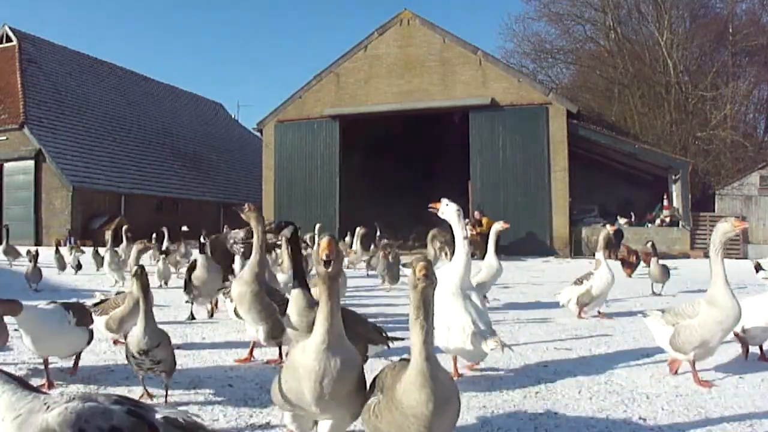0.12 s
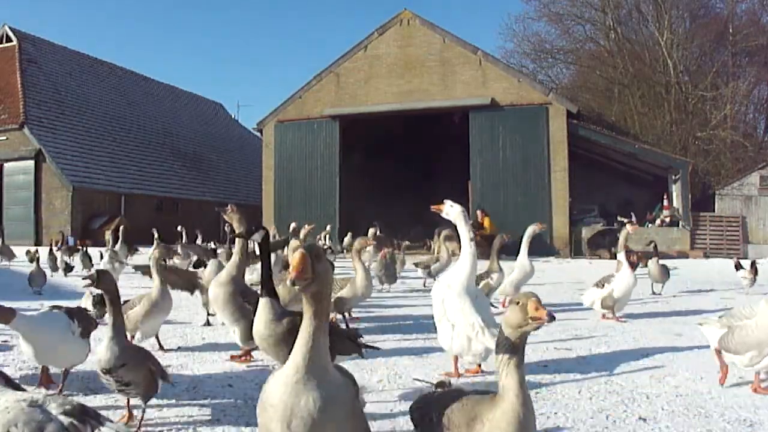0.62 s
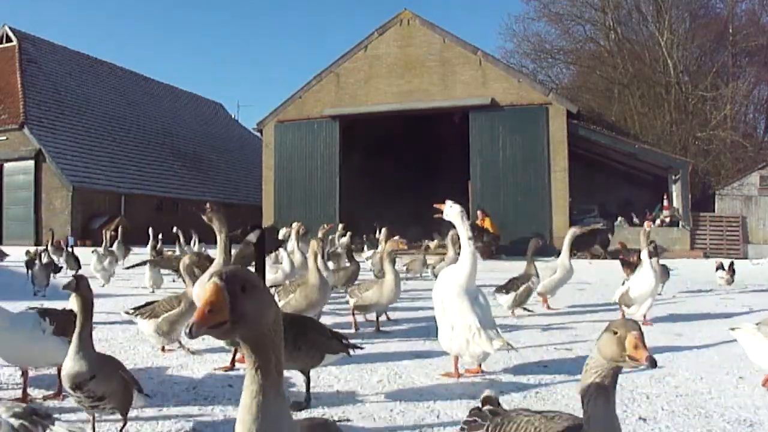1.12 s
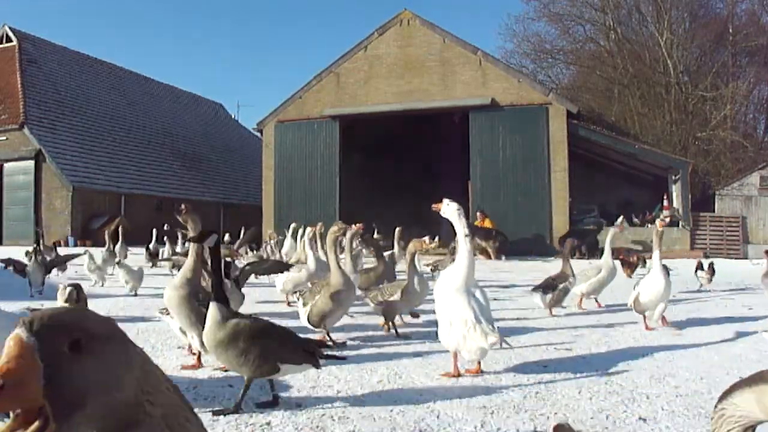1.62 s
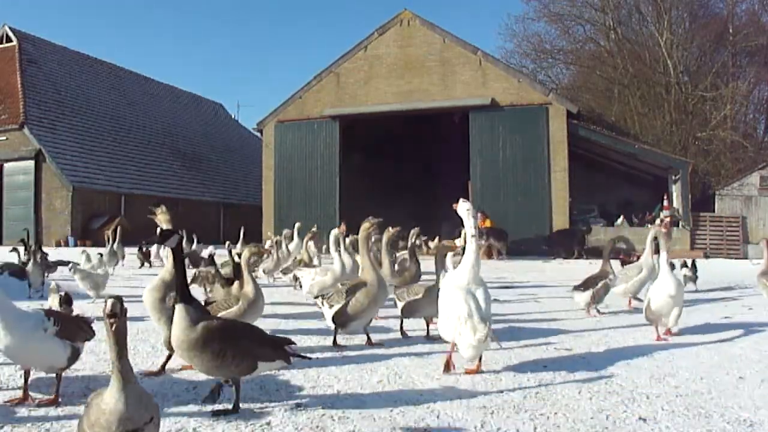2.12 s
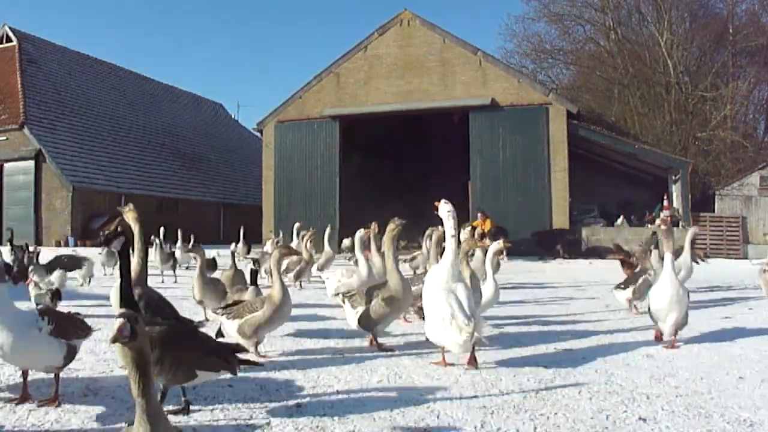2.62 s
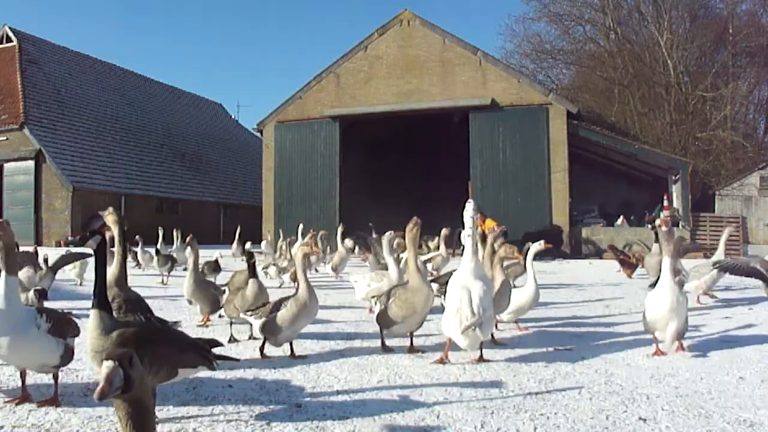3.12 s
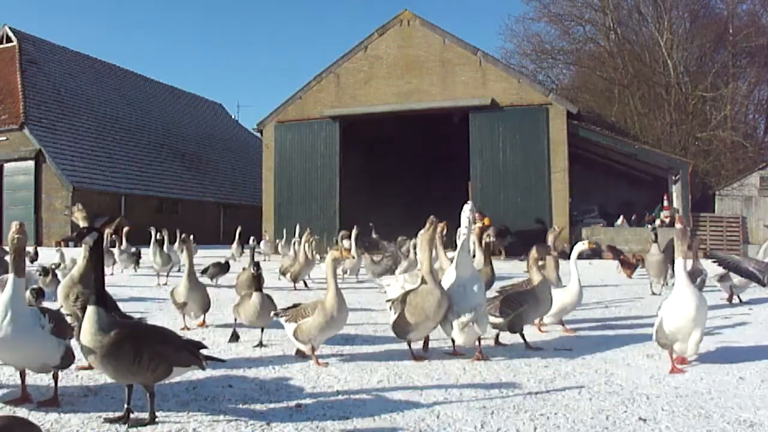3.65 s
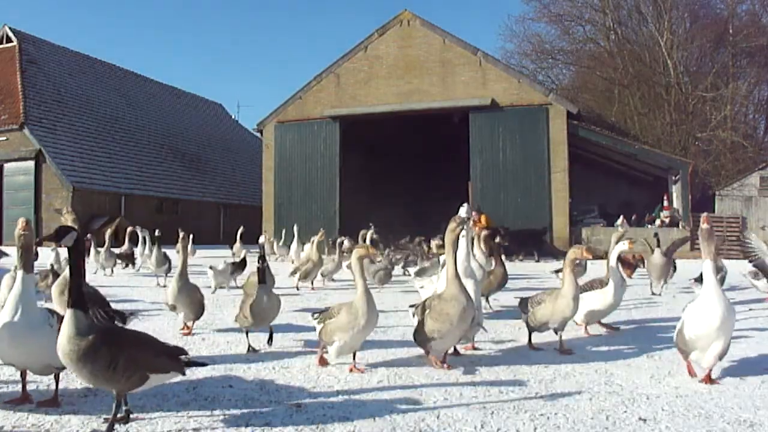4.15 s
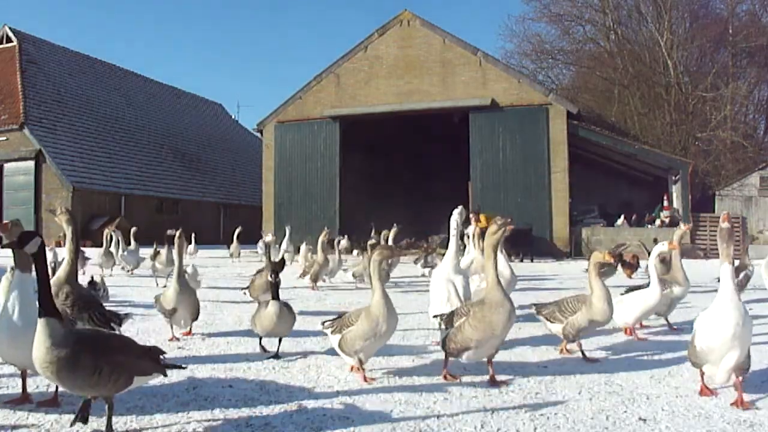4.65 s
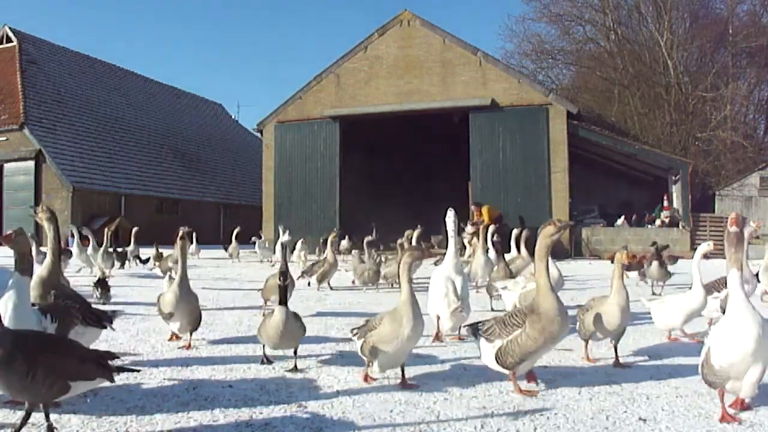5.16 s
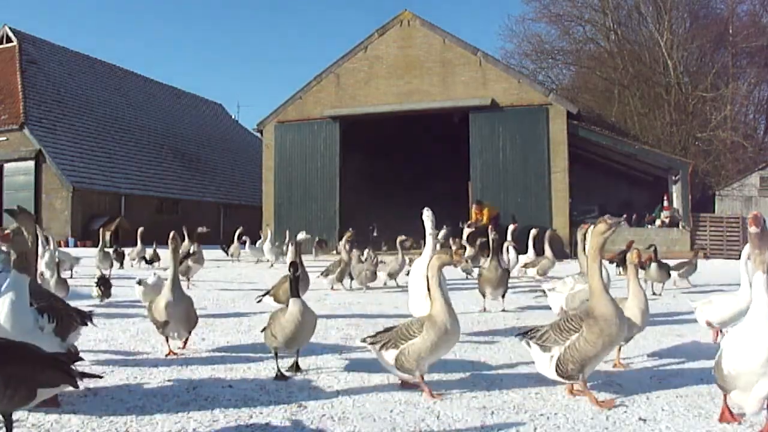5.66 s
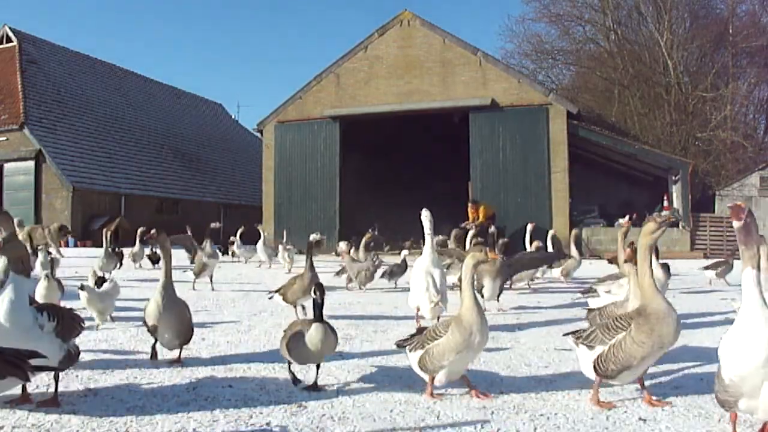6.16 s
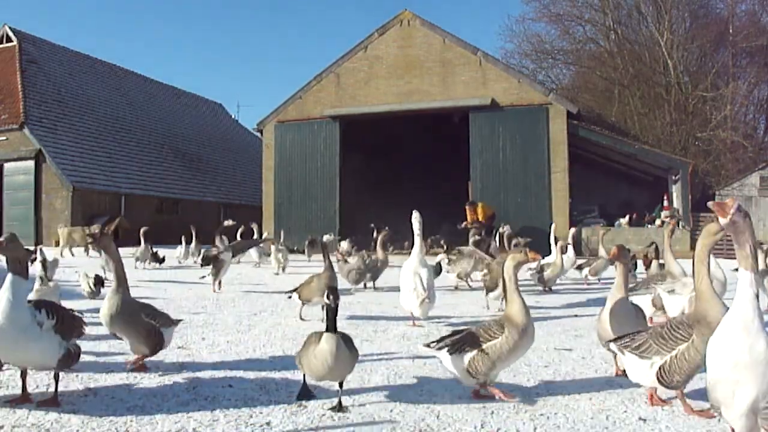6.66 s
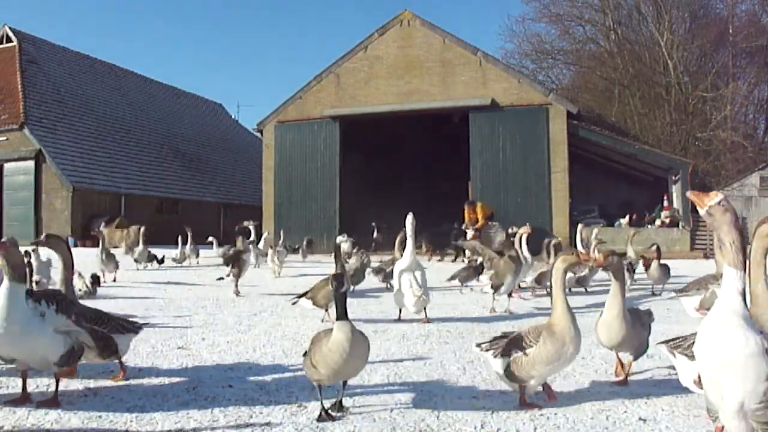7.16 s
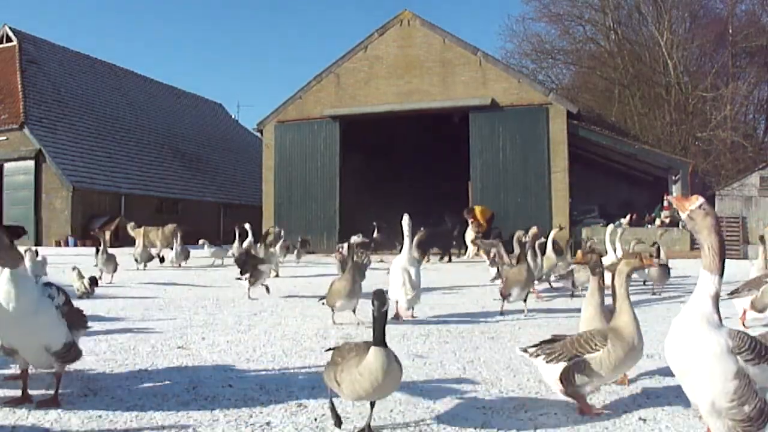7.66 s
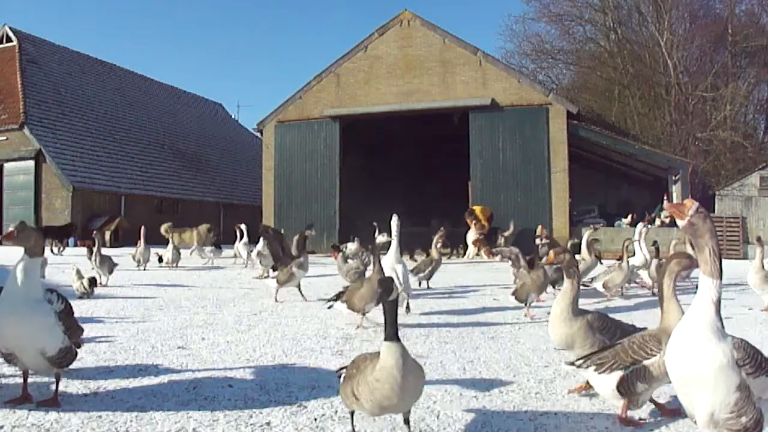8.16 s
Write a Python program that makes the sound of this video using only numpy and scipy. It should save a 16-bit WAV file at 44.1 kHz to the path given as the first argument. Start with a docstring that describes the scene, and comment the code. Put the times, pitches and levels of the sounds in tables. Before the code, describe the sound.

From 0 s a large flock of geese fills a farmyard with dense, hoarse gabble and many overlapping far honks, continuous to the end at about 8.3 s. A clear honk stands out right away, with a small wind thump near 0.5 s. Buzzing squawks rasp at about 1.0, 1.6, 3.3, 5.2, 6.7 and 7.5 s. Clear nasal honks cluster around 1.7-2.3 s and again at 3.6-4 s, some high and thin, others fuller. Between 4.3 and 6.2 s a deep gander gives short, slow-pulsing drones under the crowd. Wind buffets the microphone strongly around 6.5-6.8 s, then again at 7.3-8.2 s, with low lumpy rumble. At 7.6-8.0 s a rapid run of strong honks comes forward. Barns give short dull echoes; there is a faint low hum and slight hiss from the small microphone.

```python
"""A large flock of geese in a farmyard. From the start a dense, hoarse gabble mixes with many far honks,
over a faint low hum and lumpy wind noise; the barns return short, dull echoes of the birds.
Clear honks, stacks of overtones on a bending pitch, soon stand out, and short low thumps of wind join in.
Buzzing squawks of membrane beats follow from about one second. Past the middle a deep gander drones,
with slow pulses ringing through a big throat. A small microphone adds faint hiss and rounds the peaks."""
import sys
import numpy as np
from scipy import signal
from scipy.fft import rfft, irfft
from scipy.io import wavfile
from scipy.ndimage import uniform_filter1d

SR = 44100
rng = np.random.default_rng(int(sys.argv[2]) if len(sys.argv) > 2 else 0)


def put_to_file(sound):
    """Save the sound as 16-bit audio at rate SR, in the file named by the first command-line argument."""
    columns = np.atleast_2d(sound).T  # one column per channel
    safe = np.clip(columns, -1, 1)
    whole_steps = np.round(safe * 32767)
    wavfile.write(sys.argv[1], SR, whole_steps.astype(np.int16))


def voltage_ratio(level):
    """Linear amplitude factor for a level in decibels (scalar or array-like)."""
    return 10 ** (np.asarray(level, float) / 20)


N = 365148  # length in samples

# Level columns are relative: the functions below may shift, scale or vary them.
# crowd's chest sound, the part below the split: time_s, level_db
CHEST_LEVEL = [(0.0, -18), (0.51, -17), (0.69, -28), (1.04, -21.5), (1.25, -19.5), (1.93, -18.5),
               (2.12, -20), (2.26, -20.5), (3.04, -20), (3.32, -18.5), (5.09, -20.5), (5.33, -19),
               (5.67, -23), (6.16, -16.5), (6.27, -19.5), (7.54, -20.5), (7.86, -20.5), (8.28, -21)]
# crowd's hoarse rasp, the part above the split: time_s, level_db
RASP_LEVEL = [(0.0, -29.5), (0.51, -28.5), (0.83, -32.5), (1.43, -32.5), (1.75, -26.5), (2.12, -30),
              (2.37, -35.5), (3.0, -32), (3.32, -29), (4.0, -34), (4.08, -37), (4.15, -34), (4.8, -29.5),
              (5.03, -32.5), (5.6, -31.5), (5.8, -29), (5.86, -25.5), (5.92, -47), (5.97, -28.5),
              (6.39, -34), (6.83, -31), (7.26, -37.5), (7.72, -33.5), (8.28, -36.5)]
# colour of the gabble at the microphone: frequency_hz, level_db
GABBLE_COLOUR = [(59, -61), (100, -44.5), (157, -22.5), (394, -23.5), (508, -7.5), (681, -15), (796, -9.5),
                 (1230, -7.5), (1380, -5), (2530, -13.5), (4460, -20), (10800, -55.5), (14000, -92.5),
                 (22000, -120)]
# windpipe resonances of a middle-sized goose: frequency_hz, width_hz, level_db
WINDPIPE = [(872, 223, 4), (1198, 273, 4), (1583, 500, -6), (2544, 560, -2), (3444, 81, -5.5),
            (5110, 290, -6.5)]
# nine kinds of honking voice, one row each: level_db of every overtone from the first up
VOICES = [(-6, -2.5, -18, -22.5, -36, -29, -37.5, -47.5, -51),
          (-8.5, -21, -18, -22, -36, -42, -50, -52.5, -55.5),
          (-3.5, -7.5, -18.5, -22, -25.5, -28.5, -33.5, -38.5, -49.5),
          (7.5, -12.5, -26, -14, -22, -41, -38, -50, -62),
          (-0.5, -1, -18.5, -26.5, -30.5, -41, -55.5, -57, -67.5),
          (2, -10.5, -27, -36, -52.5, -55.5, -61, -64.5, -71),
          (-14, -19, -13, -13, -10.5, -10, -16, -21, -26.5, -35.5, -27.5, -38, -34.5),
          (-3.5, -6, -25.5, -11, -31, -28, -33, -53, -57), (-4, -1, -21, -26, -42, -51)]
# clear honks, one list per voice: start_s, length_s, level_db, middle_pitch_hz, glide_percent (over the call)
HONKS = [
    [(0.05, 0.11, -19.5, 827, 5.5), (1.94, 0.12, -29, 764, 3.5), (2.51, 0.062, -26.5, 793, -0.5),
     (3.612, 0.11, -19.5, 837, 13), (3.82, 0.054, -15.5, 783, 6.5), (3.925, 0.112, -17, 822, 11),
     (4.65, 0.084, -18.5, 894, 1.2), (5.84, 0.26, -30, 728, 3), (6.26, 0.1, -19.5, 802, 20),
     (7.0, 0.037, -21.5, 947, -1)],
    [(7.625, 0.0897, -13.5, 816.5, 6), (7.7, 0.05, -10.5, 805, -8), (7.76, 0.08, -12.5, 843, 5),
     (7.868, .04, -15.5, 822, -7.5), (7.92, 0.051, -10.5, 841, 9), (8.0, 0.051, -18, 847, -1)],
    [(0.59, 0.12, -17.5, 820.6, 0), (1.555, 0.066, -22, 753, -2.5), (2.035, 0.135, -18, 855.3, 5.5),
     (2.203, 0.127, -17, 840.7, 4), (8.02, 0.075, -19, 866, 5)],
    [(0.518, 0.083, -32, 1132, -6), (2.293, 0.031, -32.5, 1145, -7.5), (3.872, 0.044, -22, 1151, -1),
     (4.03, 0.023, -20.5, 1172, -2.5)],
    [(0.205, 0.067, -33.5, 1230, -1), (0.35, 0.051, -21.5, 1042, -3), (0.41, 0.2, -29.5, 1120, -5.5),
     (0.8, 0.11, -32, 1274, 2), (2.9, 0.064, -37, 1037, 3.5), (2.9, 0.17, -34, 1528, -2),
     (3.028, 0.15, -31.5, 1272, -7), (3.09, 0.1, -27.5, 1067, 4), (3.125, 0.12, -23.5, 1187, -2.5),
     (4.146, 0.044, -21, 1482, 3), (5.345, 0.043, -31.5, 1494, 3), (5.47, 0.025, -29, 1351, -3.5),
     (5.463, 0.04, -19.5, 1478, -3.5), (5.492, 0.042, -20, 1206, 1.5), (6.36, 0.054, -29, 1432, 1.5),
     (6.55, 0.11, -41, 1646, 0.5), (7.02, 0.062, -31.5, 1583, -6), (7.03, 0.099, -34.5, 1045, 1),
     (7.575, 0.048, -29.5, 1177, 8), (8.22, 0.083, -33, 1087, 3)],
    [(0.18, 0.097, -29.5, 1155, -7.5), (0.48, 0.085, -23, 956, 7.5), (1.13, 0.25, -28, 829, 2.5),
     (1.36, 0.13, -24, 808, -13), (1.315, 0.07, -27, 1290, 2.5), (1.73, 0.12, -19.5, 1356, 4),
     (1.85, 0.094, -22, 1735, -6), (1.91, 0.19, -19.5, 1355, 2.5), (2.16, 0.057, -22.5, 1323, -5),
     (2.36, 0.13, -38.5, 1158, -2), (2.56, 0.236, -28, 814, -3), (3.06, 0.13, -26, 995.6, -2),
     (3.22, 0.084, -27.5, 1768, 8.5), (3.43, .04, -27, 1877, 7), (3.57, 0.07, -24.5, 1160, -1.5),
     (4.01, 0.19, -36, 805.3, -9), (4.13, 0.27, -31.5, 1327, -0.5), (4.21, 0.07, -36.5, 694, 8.5),
     (4.28, 0.21, -26, 967, 2.6), (4.488, 0.07, -27.5, 634, -11.5), (5.13, 0.12, -23.5, 967, 2.5),
     (5.63, 0.22, -32.5, 802, -1), (5.72, 0.16, -31.5, 1303, 1), (5.86, 0.18, -29.5, 1506, 4),
     (5.94, 0.059, -26, 685, 6.5), (6.9, 0.11, -41, 486, 4), (7.21, 0.24, -28.5, 1458, -2),
     (7.42, 0.12, -26.5, 1181, 0.5), (7.77, 0.15, -37, 429, -7), (7.83, 0.18, -26.5, 856, 3),
     (8.1, 0.07, -22.5, 1045, 8.5)],
    [(4.417, 0.11, -25, 784.8, 1.1)],
    [(5.38, 0.07, -21.5, 1075, 0.78), (5.55, 0.1, -25, 1066, 1)],
    [(1.125, 0.155, -26, 1279, -1.6), (4.46, 0.19, -23.5, 1198, 0.00029), (4.778, 0.15, -20.5, 1225, 2.7),
     (6.17, .17, -21, 1198, 0.4), (6.455, 0.19, -24, 1219, 0.78), (6.825, 0.16, -21, 1224, -0.74)],
]
# bend of each voice: scoop_percent (at the start), drop_percent (at the end),
# strain_db (brightening at both ends, per overtone; below zero it dulls)
BENDS = [(1.2, 3.3, 3.5), (1.5, 1.3, 3), (4, 14, 5), (0.47, 1.9, 0), (2.2, 3.2, 2.5), (0.53, 0.9, 1.5),
         (0.41, 6.4, 0.1), (0.82, 1.2, -1), (0.92, 1.5, 1)]
# strength of the wind at the microphone: time_s, level_db
WIND_LEVEL = [(0.0, -55), (0.11, -89), (0.32, -57.5), (0.78, -66.5), (0.83, -57.5), (1.27, -62),
              (1.8, -53.5), (1.84, -73.5), (2.24, -79), (2.33, -56), (2.97, -69.5), (3.62, -53.5),
              (3.74, -89), (4.31, -85.5), (4.56, -61.5), (4.66, -66), (6.15, -64), (6.23, -50),
              (6.57, -41.5), (6.85, -44.5), (6.92, -71), (7.05, -51), (7.25, -48), (7.75, -42.5),
              (7.79, -52.5), (8.28, -43.5)]
# colour of the wind noise: frequency_hz, level_db
WIND_COLOUR = [(20, -18.5), (60, -13.5), (150, 0.5), (300, -3), (600, 1), (1500, -50)]
# single wind buffets: time_s, peak_db, centre_hz
BUFFETS = [(0.549, -26.5, 266), (1.805, -24, 350), (6.456, -14, 330), (6.523, -15, 299.3), (6.549, -8, 322),
           (6.572, -12.5, 297), (6.589, -9.5, 340), (6.641, -20, 285), (6.678, -12, 333.7),
           (6.765, -26, 411), (7.286, -15.5, 298), (7.409, -24, 195), (7.541, -19.5, 330),
           (7.664, -11.5, 395), (7.988, -27.5, 184.6), (8.212, -15.5, 257)]
# hoarse, buzzing squawks: peak_time_s, peak_db
SQUAWKS = [(1.0303, -12.5), (1.612, -12), (1.66, -18), (1.8904, -25), (3.265, -8.5), (3.4116, -14.5),
           (4.67, -17), (5.226, -8), (5.8433, -16), (5.9595, -18), (6.696, -9.5), (6.815, -13),
           (7.4907, -13.5), (7.758, -13)]
# the gander's drones: start_s, end_s, pulse_rate_hz, level_db
DRONES = [(4.28, 4.429, 160.2, -32.5), (4.61, 4.762, 158, -28), (5.57, 5.673, 174.9, -33.5),
          (5.66, 5.85, 160.1, -22.5), (6.02, 6.156, 163.4, -29)]
# the gander's throat as a filter: frequency_hz, level_db
GANDER_THROAT = [(71, -47.5), (120, -9.5), (323, -26), (765, 0), (1240, 4), (1780, -14), (2300, -6),
                 (2750, 7), (3500, 5), (4000, -8), (4970, -13), (10500, -46.5), (13600, -84), (22000, -120)]


def rms_one(x):
    """Scale to an average power of one."""
    return x / np.sqrt(np.mean(x ** 2) + 1e-20)


def level_in_time(rows):
    """Join the points of a level curve by straight lines, giving a value for every sample."""
    times_s, levels_db = np.transpose(rows)
    return np.interp(np.arange(N) / SR, times_s, levels_db)


def cut(x, order, hz, side):
    """Keep the part of a sound on one side of a frequency ("low" or "high"); higher order is steeper."""
    return signal.sosfilt(signal.butter(order, hz, side, fs=SR, output="sos"), x)


def colour(x, points, size=2048):
    """Filter to a given spectrum without sounding early (minimum phase through the cepstrum)."""
    hz, db = np.transpose(points)
    grid_hz = np.maximum(np.arange(size + 1) * SR / 2 / size, 1)
    log_gain = np.interp(np.log(grid_hz), np.log(hz), db) * np.log(10) / 20
    cepstrum = irfft(log_gain)
    # fold the second half onto the first
    cepstrum[1:size] *= 2
    cepstrum[size + 1:] = 0
    response = irfft(np.exp(rfft(cepstrum)))
    return signal.fftconvolve(x, response)[:N]


def drift(rate, size):
    """Random wandering: normal random points, rate per second, joined by straight lines."""
    knots = rng.standard_normal(int(size * rate / SR) + 2)
    return np.interp(np.arange(size) * rate / SR, np.arange(len(knots)), knots)


def resonance(x, hz, width):
    """An air space ringing at one frequency: two poles, gain 1 on top."""
    r = np.exp(-np.pi * width / SR)
    top = [(1 - r * r) / 2, 0, (r * r - 1) / 2]
    bottom = [1, -2 * r * np.cos(2 * np.pi * hz / SR), r * r]
    return signal.lfilter(top, bottom, x + 1e-18)


def add(out, start, sound):
    """Mix a sound into out from a start time in seconds, trimming what falls outside."""
    i = round(start * SR)
    sound = sound[max(-i, 0):N - i]
    out[max(i, 0):max(i, 0) + len(sound)] += sound


def breath(size, edge):
    """A call swells fast, holds and stops; a smaller edge makes both ends steeper."""
    return np.sin(np.pi * np.arange(size) / size) ** edge


def pulses(size, rate, jitter, shimmer, hiss):
    """Membrane beats: one click a cycle, with a puff of air noise after each; hiss is the puffs' power share."""
    cycle = np.cumsum(rate * (1 + jitter * drift(rate, size))) / SR
    click = np.diff(np.floor(cycle), prepend=0)
    beat = click * (1 + shimmer * rng.standard_normal(size))
    puff = np.exp(-4.0 * (cycle % 1)) * rng.standard_normal(size)
    return np.sqrt(1 - hiss) * rms_one(beat) + np.sqrt(hiss) * rms_one(puff)


def gabble(count=8, each=140):
    """Hoarse syllables from birds of eight sizes: membrane beats through a windpipe scaled to each size."""
    out = np.zeros(N)
    for body in np.linspace(.8, 1.25, count):
        beats = np.zeros(N)
        for when, long, high, loud in rng.random((each, 4)):
            size = round((.03 + .13 * long ** 2) * SR)
            rate_hz = body * (120 + 130 * high)
            syllable = pulses(size, rate_hz, jitter=.004, shimmer=.1, hiss=.05)
            add(beats, when * (N / SR + .1) - .1, voltage_ratio(-13 * loud) * breath(size, .39) * syllable)
        pipe = np.zeros(N)
        for k, (hz, width, db) in enumerate(WINDPIPE):
            # neighbouring resonances have opposite signs
            pipe += (-1) ** k * voltage_ratio(db) * resonance(beats, hz * body, width)
        out += pipe + voltage_ratio(-13.5) * beats
    return rms_one(colour(out, GABBLE_COLOUR))


def honk(voice, length, db, pitches_hz, waver, flutter_db, strain_db, rattle=0.0):
    """The syrinx (voice organ) sings a stack of overtones on a bending, slightly unsteady pitch."""
    size = round(length * SR)
    along = np.arange(size) / size
    pitch = np.interp(along, [0, .3, .75, 1], pitches_hz)
    pitch = uniform_filter1d(pitch, size // 8, mode="nearest")
    unsteady = 1 + waver * (drift(300, size) + drift(25, size))
    phase = 2 * np.pi * np.cumsum(pitch * unsteady) / SR
    # extra overtones above the listed ones fall by 4 dB each
    extra_db = voice[-1] - 4.0 * np.arange(1, len(voice) // 2)
    levels_db = np.append(voice, extra_db)[:, None]
    order = np.arange(1, len(levels_db) + 1)[:, None]
    # the timbre changes at both ends of the call
    ends = np.clip(np.abs(2 * along - 1) * 3.77 - 1.9, 0, 1)
    strain = np.minimum(order - 1, 3.0) * strain_db * ends
    # each overtone above the first comes and goes
    flicker = 1.57 * np.array([drift(30, size) for _ in order]) * (order > 1)
    heard = order * pitch < SR / 4
    waves = np.sin(order * phase + order ** 2)
    stack = np.sum(voltage_ratio(levels_db + strain + flicker) * heard * waves, axis=0)
    flutter = flutter_db * (drift(37, size) + drift(220, size))
    # rattle: the loudness beats at a fraction of the pitch
    rattling = 1 + rattle * np.cos(phase / rng.uniform(3, 9))
    return np.sqrt(2) * voltage_ratio(db + flutter) * breath(size, .35) * stack * rattling


def far_honks(count=660):
    """Rattling honks all over the yard at random moments; distance has taken their upper overtones."""
    out = np.zeros(N)
    for when, long, who, high, arch, loud in rng.random((count, 6)):
        kind = int(who * len(VOICES))
        clear_call = HONKS[kind][int(high * len(HONKS[kind]))]
        # near the pitch of a clear call, longer calls higher
        hz = max(clear_call[3], 780) * (.92 + .16 * long)
        sag = 1 - .1 * arch
        arc_hz = hz * np.array([sag, 1, 1, sag * sag])
        call = honk(VOICES[kind][:5], .04 + .13 * long ** 2, -7 * loud, arc_hz,
                    waver=.005, flutter_db=1.5, strain_db=.5, rattle=.25)
        add(out, when * (N / SR + .1) - .1, call)
    return rms_one(cut(out, 3, 1950, "low"))


def even_out(x):
    """Birds fill each other's pauses: lift quiet moments and lower loud ones, over a tenth of a second."""
    return rms_one(x / uniform_filter1d(x ** 2, SR // 10) ** .3)


def crowd():
    """Gabble and far honks, split into chest sound and rasp that rise and fall separately."""
    split_hz = 3080
    voices = gabble() + voltage_ratio(2.2) * far_honks()
    chest = even_out(cut(voices, 3, split_hz, "low"))
    rasp = even_out(cut(voices, 3, split_hz, "high"))
    chest_gain = voltage_ratio(level_in_time(CHEST_LEVEL) - 2.5)
    rasp_gain = voltage_ratio(level_in_time(RASP_LEVEL) + 3.0)
    return chest_gain * chest - rasp_gain * rasp


def low_hum():
    """A faint hum of many low voices: noise through two resonances, wandering in level."""
    hum = resonance(rng.standard_normal(N), 162, 30)
    hum = rms_one(resonance(hum, 162, 45))
    return voltage_ratio(-56 + 3.5 * drift(4.7, N)) * hum


def wind():
    """Wind across the microphone: lumpy low noise whose strength wanders quickly."""
    noise = rms_one(colour(rng.standard_normal(N), WIND_COLOUR))
    return voltage_ratio(level_in_time(WIND_LEVEL) + 11.0 + 6.35 * drift(30, N)) * noise


def barns(x, t60=0.81, wall_hz=3500):
    """Scattered, dulled echoes from walls around the yard, fading 60 dB in t60 seconds."""
    t = np.arange(SR // 2) / SR
    scattered = rng.standard_normal(len(t)) * (rng.random(len(t)) < .01)
    echoes = scattered * voltage_ratio(-60 * t / t60) * (t > .02)
    echoes = cut(echoes, 1, wall_hz, "low")
    return signal.fftconvolve(x, echoes / np.sqrt(np.sum(echoes ** 2)))[:N]


def bend(hz, glide, scoop, drop):
    """Pitch at the start, 30%, 75% and end of a call: a straight glide, scooped into and dropped out of."""
    line = 1 + glide / 100 * (np.array([0, .3, .75, 1]) - .5)
    return hz * line * (1 - np.array([scoop, 0, 0, drop]) / 100)


def near_geese():
    """The clear honks that stand out, each kind of voice with its own overtones and bend."""
    out = np.zeros(N)
    for voice, (scoop, drop, strain_db), calls in zip(VOICES, BENDS, HONKS):
        for start, length, db, hz, glide in calls:
            pitches_hz = bend(hz, glide, scoop, drop)
            call = honk(voice, length, db, pitches_hz, waver=.003, flutter_db=1.1, strain_db=strain_db)
            add(out, start, call)
    return out


def buffets():
    """Wind thumps the microphone membrane: short low waves that swell and fade within a few cycles."""
    out = np.zeros(N)
    t = np.arange(-3 * SR // 100, 3 * SR // 100) / SR
    for when, db, hz in BUFFETS:
        thump = np.exp(-(t * hz / 0.62) ** 2) * np.cos(2 * np.pi * hz * t)
        add(out, when - .024, voltage_ratio(db) * thump)  # the peak comes 6 ms after the listed time
    return out


def squawks():
    """Buzzes of membrane beats that rise fast and fade; only their rasp stands above the crowd."""
    rise_s, fade_s, crest_db, low_hz = 0.03, 0.052, 12.5, 1700
    beats, t = np.zeros(N), np.arange(SR // 4) / SR
    swell = np.minimum(t / rise_s, np.exp((rise_s - t) / fade_s))
    rates_hz = rng.uniform(190, 330, len(SQUAWKS))
    for (when, db), rate in zip(SQUAWKS, rates_hz):
        buzz = pulses(len(t), rate, jitter=.012, shimmer=.2, hiss=.12)
        # a buzz peaks well above its average level, so allow for that crest
        add(beats, when - rise_s, voltage_ratio(db - crest_db) * swell * buzz)
    # divide by what the same filters do to plain noise
    scale = np.std(cut(colour(rng.standard_normal(N), GABBLE_COLOUR), 2, low_hz, "high"))
    return cut(colour(beats, GABBLE_COLOUR), 2, low_hz, "high") / scale


def gander():
    """A deep drone: steady, slow membrane pulses through a big throat."""
    beats = np.zeros(N)
    for start, end, rate, db in DRONES:
        size = round((end - start) * SR)
        drone = pulses(size, rate, jitter=.0015, shimmer=.08, hiss=.04)
        add(beats, start, voltage_ratio(db) * breath(size, .4) * drone)
    # divide by what the throat does to plain noise
    scale = np.std(colour(rng.standard_normal(N), GANDER_THROAT))
    return colour(beats, GANDER_THROAT) / scale


def scene():
    """All birds, their echoes and the wind; no goose reaches below the gander's pitch."""
    rest = crowd() + squawks()
    near = low_hum() + near_geese() + gander()
    # the rest of the flock echoes more strongly than the near birds
    echoes = barns(voltage_ratio(-26.0) * near + voltage_ratio(-15) * rest)
    birds = cut(near + rest + echoes, 4, 120, "high")
    return (birds + wind() + buffets())[None]


def low_pass(x):
    """Removes everything above the highest recorded frequency."""
    return signal.sosfilt(signal.butter(12, 10910, fs=SR, output="sos"), x)


def record(dry):
    """The small microphone hisses faintly; peaks are rounded; the amplifier loses the deepest bass."""
    hiss = voltage_ratio(-67.5) * cut(rng.standard_normal(N), 2, 5500, "high")
    rounded = 0.68 * np.tanh((dry + hiss) / 0.69)
    thin = cut(rounded, 2, 60, "high")
    return low_pass(thin)


dry = scene()
out = record(dry)
put_to_file(out)
```